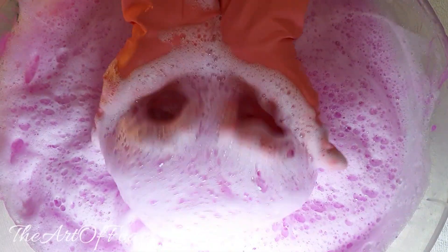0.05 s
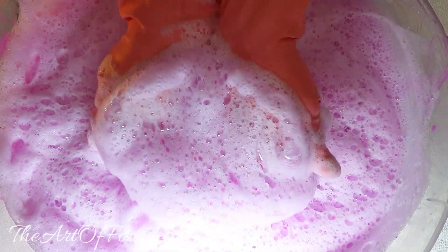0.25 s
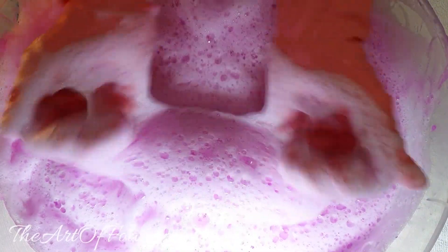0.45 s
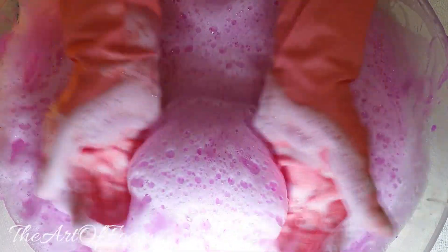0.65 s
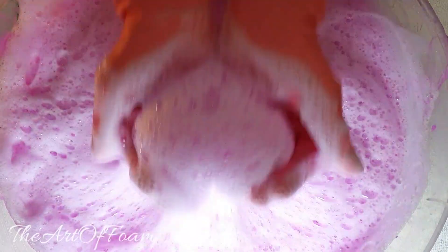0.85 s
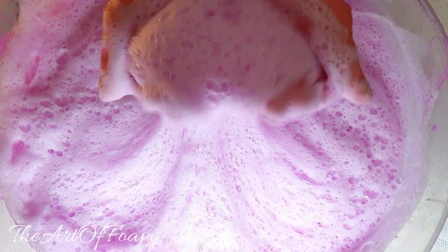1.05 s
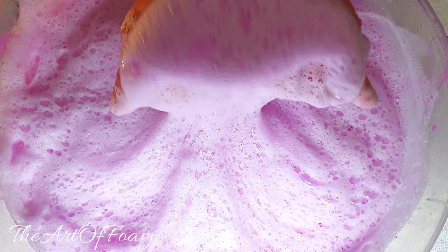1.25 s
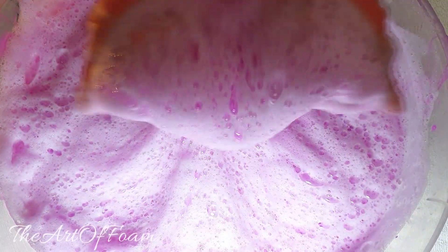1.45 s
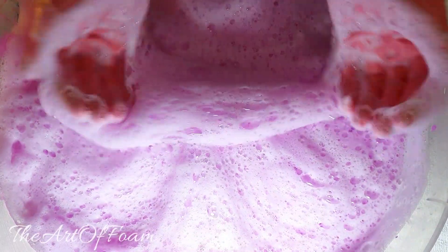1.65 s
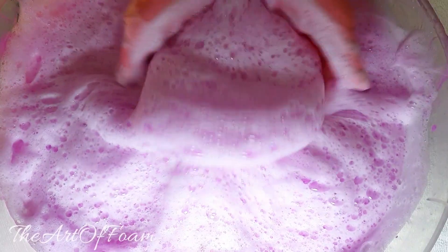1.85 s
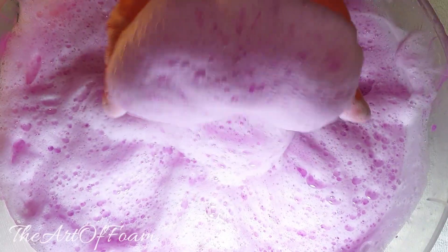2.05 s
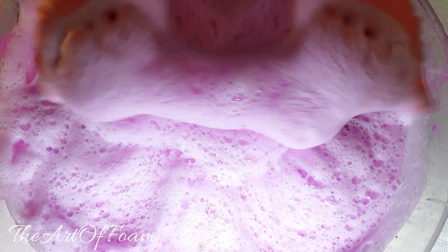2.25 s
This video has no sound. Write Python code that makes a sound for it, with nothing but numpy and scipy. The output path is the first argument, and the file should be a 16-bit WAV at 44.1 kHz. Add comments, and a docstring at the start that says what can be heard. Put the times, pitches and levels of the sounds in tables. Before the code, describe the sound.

Three wet squelches of a sponge squeezed in suds, with soft crackling and fizzing between.

```python
"""In a basin of thick foam, close by, gloved hands grab and squeeze a soapy sponge three times.
Each grab crackles as soap films tear, muffled by the suds. Each squeeze swells until air spits out
through snapping films and gulping air pockets. Suds then seep back, the hands push through the foam
and tiny bubbles fizz, all over a low room hum."""
import sys
import numpy as np
from scipy import signal
from scipy.fft import rfft, irfft, next_fast_len
from scipy.io import wavfile
from scipy.ndimage import map_coordinates

SR = 44100
rng = np.random.default_rng(int(sys.argv[2]) if len(sys.argv) > 2 else 0)


def store_pcm(level_fs):
    """Save levels as 16-bit WAV."""
    pcm = np.round(np.clip(level_fs, -1, 1) * 32767).astype(np.int16)
    wavfile.write(sys.argv[1], SR, np.atleast_2d(pcm).T)


N = 105840
TIME = np.arange(N) / SR
TOP_HZ = 15850  # highest pitch kept
OPEN_S = 0.00032  # time a film or air pocket takes to open

# tone of crackle heard through foam: pitch_hz, level_db
MUFFLED_TONE = [(70, -35.5), (250, 3.5), (500, 4), (1000, -1.5), (2300, -3.5), (4000, -18), (5500, -27.5),
                (15000, -44)]
# soft tone of the seeping suds and of the room's echo: pitch_hz, level_db
SOFT_TONE = [(80, -21), (300, 1), (800, 1.5), (1600, 2), (3000, -5.5), (5000, -11), (8000, -21),
             (15000, -32)]


def amp(db):
    """Turn decibels into a gain."""
    return 10 ** (np.asarray(db) / 20)


def unit(x):
    """Scale a sound to an average power of 1."""
    return x / np.sqrt(np.mean(x ** 2) + 1e-20)


def add(track, start_s, sound):
    """Mix a sound into a track."""
    part = track[max(0, round(start_s * SR)):][:len(sound)]
    part += sound[:len(part)]


def curve(rows):
    """Join (time_s, value) points with straight lines."""
    return np.interp(TIME, *np.transpose(rows))


def wobble(per_s):
    """A smooth curve through per_s random points a second."""
    return map_coordinates(rng.standard_normal(2048), [TIME * per_s], mode="wrap")


def coloured(x, tone):
    """Filter a sound to a tone of (pitch_hz, level_db) points, at power 1."""
    size = next_fast_len(N + SR // 4)
    hz, db = np.transpose(tone)
    gain = amp(np.interp(np.log(np.fft.rfftfreq(size, 1 / SR) + 1), np.log(hz), db))
    # make the filter ring only after each click, never before it
    cepstrum = irfft(np.log(gain), size)
    cepstrum[1:size // 2] *= 2
    cepstrum[size // 2 + 1:] = 0
    response = np.exp(rfft(cepstrum, size))
    return unit(irfft(rfft(x, size) * response, size)[:N])


def steady(x):
    """Even out a crackle's slow changes in level, keeping its sharp spikes."""
    power = signal.fftconvolve(x ** 2, np.hanning(SR // 40), "same")
    return unit(x / np.sqrt(np.abs(power) + power.mean() / 20))


def swell(peak_s, rise_s, hold_s, fall_s):
    """A rounded rise, hold and fall; rise_s and fall_s each cover 20 dB."""
    before = np.maximum(peak_s - TIME, 0) / rise_s
    after = np.maximum(TIME - peak_s - hold_s, 0) / fall_s
    return amp(-20 * (before + after).clip(0, 4) ** 2)


def ticks(per_s, scatter_db):
    """Soap films break: clicks of random size at random times."""
    breaks = rng.random(N) < per_s / SR
    return breaks * amp(scatter_db * rng.standard_normal(N)) * rng.choice([-1, 1], N)


def bubbles(count, hz, spread, cycles, scatter_db):
    """Small bubbles ring at random pitches around hz, each fading 60 dB over its cycles."""
    starts = rng.integers(0, N, count)
    pitch_draw, level_draw = rng.standard_normal((2, count, 1))
    age = np.arange(SR // 100)  # in samples
    turns = np.minimum(hz * np.exp(spread * pitch_draw), TOP_HZ) * age / SR
    fade = amp(scatter_db * level_draw - 60 * turns / cycles)
    soft_ends = np.minimum(turns, 1) * (1 - age / len(age))
    rings = fade * soft_ends * np.sin(2 * np.pi * turns)
    positions = starts[:, None] + age
    return unit(np.bincount(positions.ravel(), rings.ravel(), N)[:N])


def room_hum():
    """A low, wavering hum and a tone about an octave higher, over a soft rumble."""
    # rise and fall of the hum: time_s, relative_db
    hum_levels = [(0, -31.5), (.8, -44), (1.0, -43), (1.1, -36), (1.57, -30.5), (2.0, -36.5), (2.3, -45)]
    # tone of the room's rumble: pitch_hz, level_db
    rumble_tone = [(20, -51.5), (45, 0.5), (130, -6), (220, -8.5), (330, -21.5), (700, -29.5),
                   (2000, -48.5), (16000, -40)]

    def wavering(hz):
        return np.sqrt(2) * np.sin(2 * np.pi * hz * TIME + 0.1 * wobble(6))

    hum = amp(curve(hum_levels) - 2.5) * wavering(hz=48.2)
    overtone = amp(-45 + 1.4 * wobble(4.2)) * wavering(hz=97.6)
    rumble = amp(-41) * coloured(rng.standard_normal(N), rumble_tone)
    return hum + overtone + rumble


def fizz():
    """Countless tiny bubbles burst on the foam; the louder the fizz, the brighter it sizzles."""
    # rise and fall of the fizz: time_s, relative_db
    fizz_levels = [(0, -53), (.13, -54), (.39, -57), (.49, -50), (.62, -53.5), (.8, -57.5), (1.0, -59),
                   (1.22, -58), (1.38, -56), (1.57, -53.5), (1.68, -48.5), (2.0, -57), (2.17, -54.5),
                   (2.32, -55), (2.4, -48.5)]
    # tone of the bursting foam: pitch_hz, level_db
    foam_tone = [(200, -1), (600, 6.5), (1500, 6.5), (4000, 3.5), (8000, -1.5), (11000, -5), (15500, -6)]
    level_db = curve(fizz_levels)
    sizzle_db = 0.4 * (level_db - level_db.max())
    crackle = coloured(ticks(per_s=2400, scatter_db=5), foam_tone)
    sizzle = bubbles(count=450, hz=7440, spread=0.28, cycles=3.7, scatter_db=3)
    return amp(level_db) * (amp(4.5) * crackle + amp(sizzle_db) * sizzle)


def grabs():
    """Films tear and bubbles ring under a blanket of foam."""
    # hands closing on the sponge: peak_s, rise_s, fall_s, level_db, pitch_hz
    grips = [(0.018, 0.14, 0.05, -25.5, 690), (1.096, 0.071, 0.064, -27, 812),
             (1.881, 0.027, 0.075, -20.5, 570)]
    out = np.zeros(N)
    for peak_s, rise_s, fall_s, level_db, pitch_hz in grips:
        tear = coloured(ticks(per_s=1700, scatter_db=6.3), MUFFLED_TONE)
        ring = bubbles(count=1400, hz=pitch_hz, spread=0.693, cycles=6, scatter_db=1)
        out += amp(level_db) * swell(peak_s, rise_s, 0, fall_s) * steady(tear + amp(-5) * ring)
    return out


def snaps():
    """A larger film breaks with a crack and a short ring; smaller films sound brighter."""
    # films snapping under the foam: start_s, relative_db, pitch_hz
    films = [(0.032, -24.5, 1820), (.080, -23, 2070), (0.168, -20, 1550), (.182, -19.5, 1550),
             (0.2153, 0.5, 2040), (.2300, 0.5, 1660), (0.237, -15, 4800), (0.3425, -23.5, 1110),
             (.994, -28.5, 1540), (1.020, -35, 1250), (1.041, -23, 1090), (1.0545, -24, 1000),
             (1.0788, -13.5, 1760), (1.0823, -12, 1900), (1.1088, -16, 2040), (1.1528, -20, 1800),
             (1.1884, -27.5, 1200), (1.2397, -27, 3320), (1.2848, -12.5, 1760), (1.2998, -22, 2370),
             (1.328, -9, 1500), (1.3427, -11.5, 3600), (1.8802, -13, 1430), (1.8985, -3, 1610),
             (2.0571, -15.5, 1510), (2.0859, -5.5, 1990), (2.0957, -12.5, 2200), (2.1033, -6.5, 3380),
             (2.1112, -8, 3200)]
    ring_cycles, crack_s = 8.9, 0.014  # each fades 60 dB in this span
    out, t = np.zeros(N), TIME[:SR // 20]
    opening = np.minimum(t / OPEN_S, 1)
    for start_s, relative_db, pitch_hz in films:
        treble_cut = signal.butter(5, min(1.815 * pitch_hz, TOP_HZ), fs=SR)
        noise = unit(signal.lfilter(*treble_cut, rng.standard_normal(len(t))))
        crack = amp(-6 - 60 * t / crack_s) * noise
        ring = np.sin(2 * np.pi * pitch_hz * t) * amp(-60 * t * pitch_hz / ring_cycles)
        add(out, start_s, amp(relative_db + 2) * opening * (ring + crack))
    return out


def squeezes():
    """Pressure builds from a muffled crackle to a wet squelch; spray spits and the flow stops short."""
    # presses on the sponge: peak_s, rise_s, hold_s, level_db, spray_rise_s, spray_db
    presses = [(0.214, 0.013, 0.017, -11, 0.028, -21.5), (1.334, 0.033, 0.0044, -19, 0.025, -29),
               (2.107, 0.023, 0.0064, -16, 0.016, -21)]
    # tone of the wet squelch: pitch_hz, level_db
    squelch_tone = [(40, -14), (200, -6.5), (500, -3.5), (1900, 1.5), (2600, -6.5), (4200, -6), (6000, -24),
                    (15000, -44)]
    # tone of the spitting spray: pitch_hz, level_db
    spray_tone = [(300, -27), (2000, -9), (4200, -1.5), (6500, -2), (9000, -10), (16000, -25)]
    fall_s = 0.014
    crackle = steady(coloured(ticks(per_s=760, scatter_db=8), MUFFLED_TONE))
    tear = coloured(ticks(per_s=1400, scatter_db=7), squelch_tone)
    ring = bubbles(count=1500, hz=1330, spread=0.467, cycles=16, scatter_db=7.5)
    squelch = steady(tear + amp(-3) * ring)
    spray = steady(coloured(ticks(per_s=1800, scatter_db=6.5), spray_tone))
    out = np.zeros(N)
    for peak_s, rise_s, hold_s, level_db, spray_rise_s, spray_db in presses:
        out += amp(-24.5) * swell(peak_s, 2.8 * rise_s, 0, fall_s) * crackle
        out += amp(level_db) * swell(peak_s, rise_s, hold_s, fall_s) * squelch
        out += amp(spray_db) * swell(peak_s + hold_s, spray_rise_s, 0, fall_s) * spray
    return out


def gulps():
    """An air pocket opens and rings briefly, its pitch sagging as it widens."""
    # air pockets opening: start_s, level_db, pitch_hz, ring_s (time to fade 60 dB)
    pockets = [(0.2145, -10, 1190, 0.025), (.2195, -5, 770, 0.043), (.2300, 1, 750, 0.022),
               (0.2377, -4, 487, 0.012), (.978, -24.5, 473, 0.011), (1.071, -16, 617, 0.025),
               (1.0818, -13, 412, 0.02), (1.1825, -25, 820, 0.018), (1.266, -23, 920, 0.049),
               (1.2845, -14, 673, 0.035), (1.3405, 0, 664, 0.0051), (1.583, -24.5, 185, 0.067),
               (1.819, -20, 680, 0.0065), (1.8675, -8.5, 595, 0.013), (1.8703, -6.5, 323, 0.026),
               (1.8799, -8, 475, 0.015), (1.898, -0.5, 522, 0.018), (1.9135, -10, 474, 0.017),
               (2.1100, -4.5, 880, 0.028), (2.1160, 0, 605, 0.014), (2.3627, -26.5, 560, 0.013)]
    sag = 0.16  # share of the pitch lost while ringing
    out, t = np.zeros(N), TIME[:SR // 10]
    opening = 1 - np.exp(-t / OPEN_S)
    for start_s, level_db, pitch_hz, ring_s in pockets:
        sagging_hz = pitch_hz * (1 - sag * np.minimum(t / ring_s, 1))
        ring = np.sin(2 * np.pi * np.cumsum(sagging_hz) / SR)
        add(out, start_s, amp(level_db - 60 * t / ring_s) * opening * ring)
    return out


def seeping():
    """Suds seep back after each squeeze with a soft crackle; dull pops linger."""
    # suds flowing back: peak_s, rise_s, level_db, fall_s
    seeps = [(.25, 0.024, -37, 0.21), (1.41, 0.14, -38.5, 0.18), (2.129, 0.027, -37, 0.2)]
    flow, linger = np.zeros((2, N))
    for peak_s, rise_s, level_db, fall_s in seeps:
        flow += amp(level_db) * swell(peak_s, rise_s, 0, fall_s)
        linger += amp(level_db - 17.5) * swell(peak_s + fall_s, fall_s, 0, 2 * fall_s)
    pops = bubbles(count=400, hz=1220, spread=0.53, cycles=2.7, scatter_db=2.5)
    crackle = steady(coloured(ticks(per_s=1600, scatter_db=4), SOFT_TONE))
    return flow * crackle + linger * pops


def churning():
    """The hands push through the foam with a dull, quiet churn."""
    # pushes of the hands: peak_s, rise_s, level_db, fall_s
    pushes = [(1.58, 0.16, -44, 0.044), (1.85, 0.22, -39.5, 0.18), (2.39, 0.079, -41.5, 0.092)]
    # tone of the shifting foam: pitch_hz, level_db
    churn_tone = [(60, -18), (200, 9.5), (600, -4.5), (3000, -30), (15000, -36)]
    motion = np.zeros(N)
    for peak_s, rise_s, level_db, fall_s in pushes:
        motion += amp(level_db) * swell(peak_s, rise_s, 0, fall_s)
    return motion * steady(coloured(ticks(per_s=380, scatter_db=4.5), churn_tone))


def echoes(sound, fade_s, room_db):
    """The basin's rim throws back six quick echoes; the room answers faintly."""
    t = TIME[:SR // 2]
    noise = coloured(rng.standard_normal(N), SOFT_TONE)[:len(t)]
    tail = noise * amp(-60 * t / fade_s) * (t > 0.002)
    answer = amp(room_db) * tail / np.linalg.norm(tail)
    for delay_s in rng.uniform(0.00143, 0.0066, size=6):
        add(answer, delay_s, amp(-20) * np.hanning(7) / 3)  # softened by the foam
    return signal.fftconvolve(sound, answer)[:N]


def scene():
    """Mix the sponge, its echoes, the foam and the hum into one channel."""
    bass_cut = signal.butter(2, 122, "high", fs=SR)  # the sponge's sounds carry little deep bass
    sponge = signal.lfilter(*bass_cut, grabs() + squeezes() + snaps() + gulps())
    echo = echoes(sponge, fade_s=0.39, room_db=-25.5)
    return (sponge + echo + seeping() + churning() + fizz() + room_hum())[None]


def record(dry):
    """Round off the loudest peaks and remove everything above TOP_HZ."""
    rounded = dry / (1 + np.abs(dry) ** 6) ** (1 / 6)
    size = next_fast_len(N + SR // 4)
    kept = np.fft.rfftfreq(size, 1 / SR) < TOP_HZ
    return irfft(rfft(rounded, size) * kept, size)[..., :N]


dry = scene()
out = record(dry)
store_pcm(out)
```